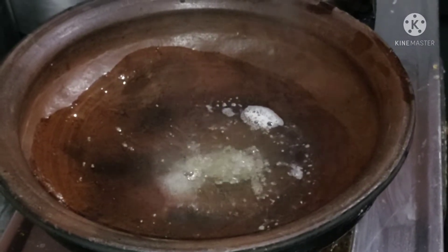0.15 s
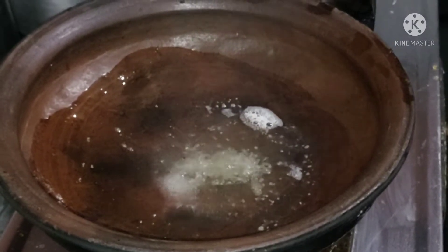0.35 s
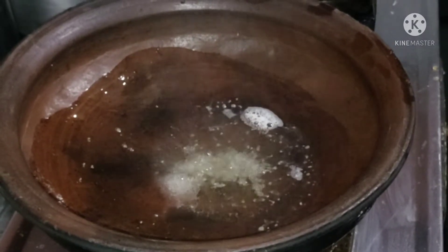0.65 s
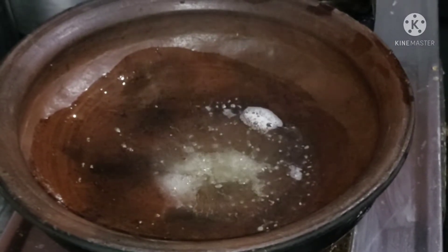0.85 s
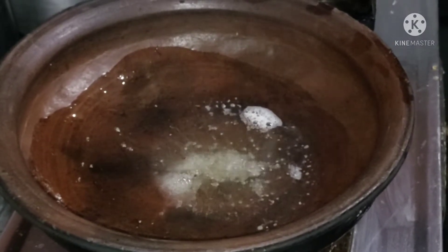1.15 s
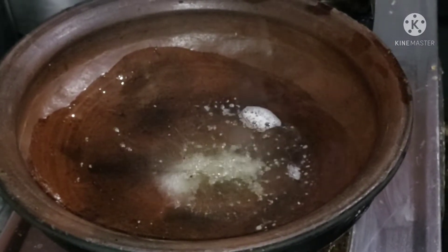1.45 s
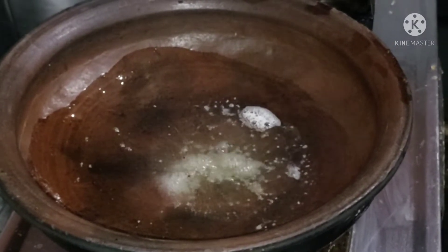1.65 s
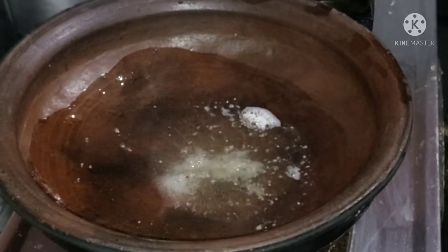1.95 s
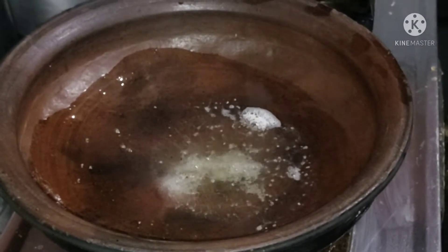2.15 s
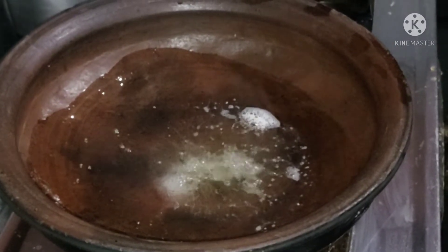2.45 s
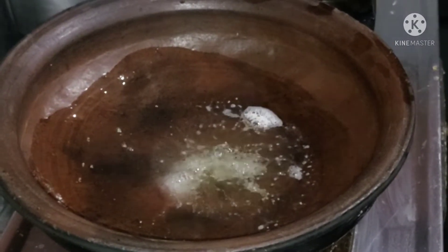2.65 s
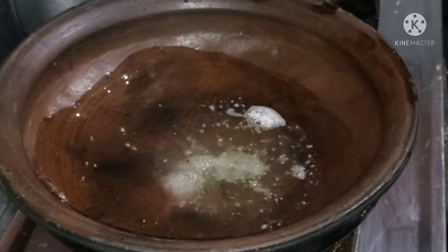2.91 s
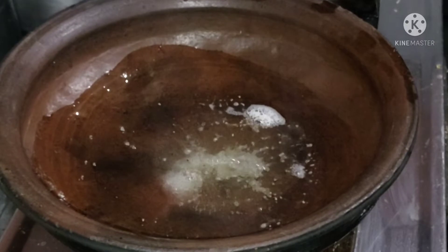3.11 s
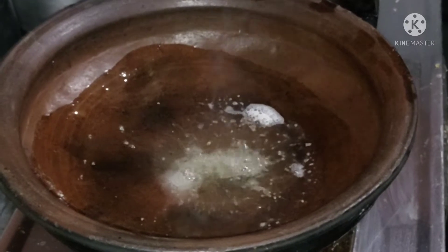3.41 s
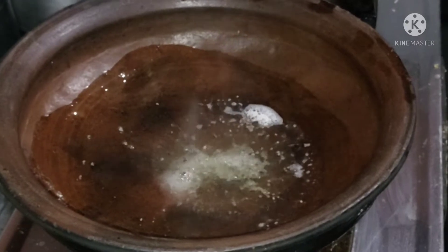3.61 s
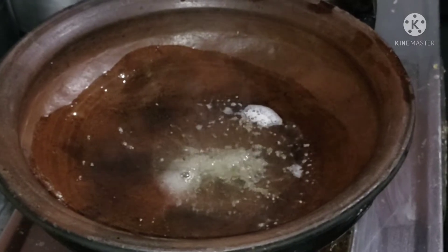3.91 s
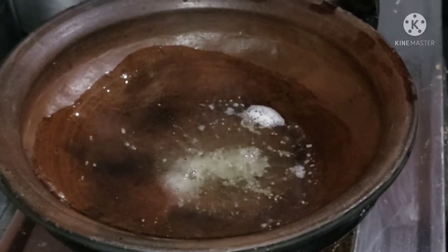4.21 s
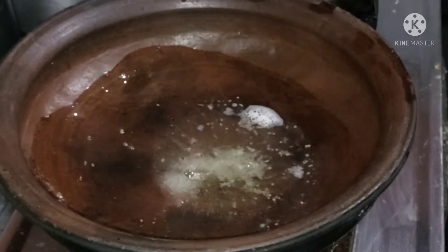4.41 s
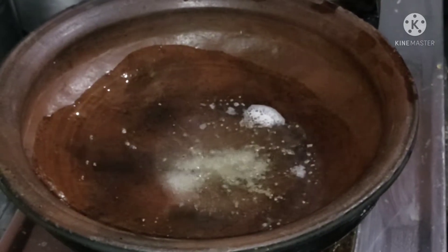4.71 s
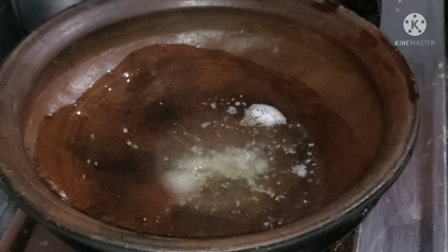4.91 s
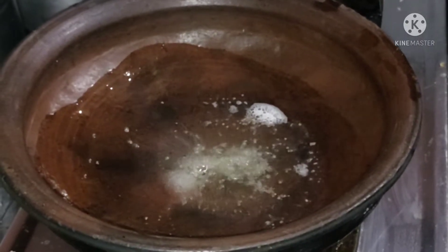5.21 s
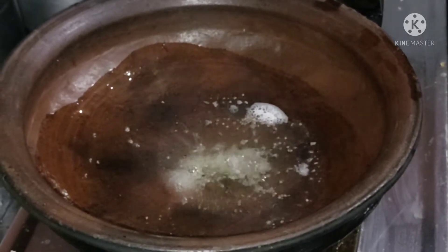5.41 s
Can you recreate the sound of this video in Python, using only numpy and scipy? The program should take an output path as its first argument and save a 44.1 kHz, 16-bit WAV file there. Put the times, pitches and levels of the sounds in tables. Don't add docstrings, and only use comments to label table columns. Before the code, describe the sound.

Irregular loud pops and small crackles of seeds bursting in oil, with hollow pot ring, tiny steam spits and short room echo.

```python
import sys
import numpy as np
from scipy import signal
from scipy.fft import rfft, irfft, next_fast_len
from scipy.io import wavfile
from scipy.ndimage import map_coordinates

SR = 44100
rng = np.random.default_rng(int(sys.argv[2]) if len(sys.argv) > 2 else 0)


def invert_db(x):
    u = np.asarray(x, float) / 20
    return 10 ** u


def wav_out(sig):
    wavfile.write(sys.argv[1], SR, np.round(np.clip(np.atleast_2d(sig).T, -1, 1) * 32767).astype(np.int16))


N = 245195
TAIL = 24576

# (frequency [Hz], width [Hz], level [dB])
POT_AIR = [(1012, 112, -8.5), (1276, 143, -3), (1591, 116.5, 4), (1900, 940, -16.5)]
# (frequency [Hz], width [Hz], level [dB])
SECOND_RING = [(2168, 213, 0)]
THIRD_RING = [(2638, 260, 0)]
# (frequency [Hz], width [Hz], level [dB])
CLAY_WALL = [(315, 310, -5.5), (481, 91, 0), (700, 120, 0.5)]
# (frequency [Hz], width [Hz], level [dB])
HUSK_CRACK = [(2970, 700, 3.5), (4300, 2060, 4.5)]
# (frequency [Hz], width [Hz], level [dB])
JET_BODY = [(5900, 3000, 0)]
JET_TOP = [(9100, 3100, -2), (15000, 9000, -6)]
# (frequency [Hz], width [Hz], level [dB])
RING_ABOVE_POT = (1595, 110, 8)

# (time [s], peak [dB], second ring re peak [dB], crack re peak [dB])
WALL_SEEDS = [(0.166, -16, -23.5, -63), (0.2, -26.5, -20, -48), (0.56, -26.5, -19, -31.5),
              (1.158, -23.5, -15, -52), (1.4206, -23.5, -12.5, -16), (1.6414, -32, -42, -49),
              (1.72, -26, -21.5, -48), (1.7675, -37.5, -26, -23), (2.1297, -39.5, -8.5, -37),
              (2.716, -50, 3, -25), (2.7965, -41, -17, -32), (4.2071, -29, -11.5, -16.5),
              (4.5132, -27.5, -11.5, -15), (4.8598, -26.5, -22, -24), (4.8699, -42.5, -4.5, -39),
              (4.9457, -30, -15.5, -23.5), (5.0372, -29.5, -11, -11), (5.0946, -25, -16.5, -15.5),
              (5.1225, -16, -17, -24.5), (5.2119, -42, -15, -34), (5.4844, -20, -13, -52),
              (5.516, -44, -6, -28)]
# (time [s], peak [dB], upper rings re peak [dB], crack re peak [dB])
BETWEEN_SEEDS = [(-0.12, -16.5, -21.5, -37), (0.041, -25.5, -21.5, -31.5), (0.435, -26, -9.5, -23),
                 (0.7773, -46, -20, -53), (1.0775, -32, -4.5, -11.5), (1.2399, -30, -14.5, -23.5),
                 (1.3007, -31, -28, -29), (1.5279, -38.5, -9.5, -7.5), (1.6297, -21.5, -19, -23.5),
                 (2.0921, -31, -11, -13.5), (2.2971, -39, -12, -9.5), (2.41, -41.5, -14.5, -20),
                 (2.5509, -15.5, -21, -23.5), (2.6106, -31.5, -19, -14), (2.7821, -35, -21, -19.5),
                 (3.029, -27.5, -24.5, -22), (3.276, -16, -22.5, -26), (3.3288, -23, -8, -12),
                 (3.3725, -20.5, -10.5, -18), (3.44, -25.5, -5, -10.5), (3.8128, -18, -16.5, -26.5),
                 (3.8993, -26.5, -40, -47), (4.6209, -24.5, -14, -11.5), (4.7566, -37.5, -15.5, -11.5),
                 (5.239, -38, -22, -20), (5.388, -48.5, 0, -26), (5.4246, -17, -16.5, -25.5),
                 (5.475, -24, -13, -14)]
# (time [s], peak [dB], third ring re peak [dB], crack re peak [dB])
MIDDLE_SEEDS = [(0.2438, -26.5, -6, -11), (0.842, -30.5, -20.5, -25.5), (1.1898, -56, -2, -36),
                (1.3721, -35.5, -4, -13.5), (1.4605, -21.5, -18.5, -30), (1.8274, -40, 7, -5),
                (1.9803, -75, -4, -29), (2.4664, -30, -14, -8.5), (2.5214, -33.5, 1.5, -19),
                (2.6722, -22, -9, -18.5), (3.348, -23.5, -14, -37), (3.456, -32, -4, 3.5),
                (3.7849, -44.5, -7, -3), (3.9378, -34.5, -14.5, -64), (5.1612, -20, -21.5, -61),
                (5.3204, -35, 3.5, -5)]
# (time [s], jet level [dB], its top re jet [dB])
STEAM_JETS = [(0.166, -47, -18), (0.2444, -46.5, -39), (0.435, -48, -14), (0.842, -53, -33),
              (1.0783, -49, -26), (1.1582, -52, -7), (1.1904, -53, -1), (1.3723, -55, -23),
              (1.4207, -61, -11), (1.4606, -51, -18), (1.5273, -33, 6), (1.6303, -44.5, -24),
              (2.0926, -53.5, -24), (2.2974, -67, -22), (2.4667, -41.5, -35), (2.6103, -75, -22),
              (2.6731, -51, -17), (2.7824, -58, -14), (2.7973, -53, -13), (3.029, -64, -16),
              (3.2767, -41.5, -10), (3.3284, -36.5, -15), (3.3488, -39.5, -20), (3.456, -48, -8),
              (3.8135, -43, -27), (4.6215, -53, -4), (4.7559, -48, -14), (5.0944, -36.5, -63),
              (5.3209, -68, -24), (5.475, -65, -34)]
# (time [s], peak [dB])
CLAY_THUDS = [(0.2, -57), (1.158, -50.5), (1.522, -50), (2.553, -59), (2.716, -57), (2.794, -76),
              (3.327, -49), (3.813, -51), (3.901, -67), (4.621, -70), (5.09, -56.5), (5.122, -59)]

# (frequency [Hz], level [dB])
STANDING_WAVES = [(715, -4), (892, -4), (983, -2), (1075, 0), (1175, -2), (1255, -4), (1324, 1), (1422, -5),
                  (1550, -2), (1628, 1), (1695, -4), (1744, -5), (1784, -4), (1842, -6), (1898, -3),
                  (1962, -5), (2077, -2), (2120, 0), (2245, -4), (2434, -5), (2686, 0), (2955, -4),
                  (3187, -1), (3436, -4)]
# (frequency [Hz], decay by 60 dB [s])
KITCHEN_DECAY = [(300, 0.81), (800, 0.45), (2100, 0.4), (5500, 0.23), (14000, 0.35)]
# (frequency [Hz], correlation [-1..1])
PORT_LIKENESS = [(30, 0.5), (100, 0.14), (300, 0.6), (700, 0.38), (1500, 0.011), (15000, 0.014)]
# (frequency [Hz], left minus right [dB])
PORT_DIFFERENCE = [(60, 1), (95, 1), (150, 0), (240, 0), (380, 0), (600, 2), (950, 0), (1500, 0.5),
                   (2380, -2.5), (3770, -7), (5980, -5), (9470, 4.5), (15000, 12)]

# (start [s], end [s], frequency [Hz], level [dB])
FAR_HORNS = [(-.1, .17, 768, -62), (-.1, .2, 965, -65), (-.1, .2, 860, -70), (.14, .28, 760, -64),
             (.16, .36, 690, -70), (.71, .93, 357, -74), (2.62, 2.79, 387, -60), (2.76, 2.89, 389, -70),
             (2.77, 2.89, 516, -70), (2.77, 2.89, 356, -71), (2.92, 3.06, 391, -77)]
# (frequency [Hz], density [dB per Hz])
AIR_COLOUR = [(12, -11), (20, -6.5), (98, -3), (168, -7), (293, -12), (446, -13), (527, -14.5),
              (698, -20.5), (1570, -17), (2460, -17), (10500, -22.5), (16000, -31.5)]
# (time [s], peak [dB], half width [s])
MOTOR_SWELLS = [(.32, -66, .07), (.8, -82, 0.49), (1.22, -71, 0.13), (2.12, -70.5, 0.091),
                (2.72, -79, 0.067), (3.38, -90, 0.24), (3.75, -90, 0.039), (3.95, -70, 0.032),
                (4.27, -72, .06), (4.68, -72.5, 0.23), (5.56, -83, 0.061)]


def unit(x):
    return x / np.sqrt(np.mean(x ** 2) + 1e-20)


def along(points, hz):
    f, v = np.transpose(points)
    return np.interp(np.log(hz + 1), np.log(f + 1), v)


def wobble(rate):
    knots = rng.standard_normal(int(N * rate / SR) + 4)
    return map_coordinates(knots, [np.arange(N) * rate / SR])


def filtered(x, response):
    m = next_fast_len(N + SR // 2)
    return irfft(rfft(x, m) * response(np.fft.rfftfreq(m, 1 / SR)), m)[..., :N]


def spread(f):
    return np.arccos(np.clip(along(PORT_LIKENESS, f), -1, 1)) / 2


def paired(shared, opposite, turn):
    mid, side = np.cos(turn) * shared, np.sin(turn) * opposite
    return np.array([mid + side, mid - side])


def resonance(f, hz, width):
    return 1j * f * width / (hz * hz - f * f + 1j * f * width)


def ring(modes, f):
    tone = 0
    for k, (hz, width, db) in enumerate(modes):
        tone = tone + (-1) ** k * invert_db(db) * resonance(f, hz, width)
    low, high = modes[0][0], modes[-1][0]
    tone = tone * (1j * f / low / (1 + 1j * f / low)) ** 2 / (1 + 1j * f / high) ** 2
    return tone / np.abs(irfft(tone)).max()


def pot_rings(f):
    sources = (POT_AIR, SECOND_RING, THIRD_RING, CLAY_WALL, HUSK_CRACK, JET_BODY, JET_TOP)
    rings = np.array([ring(modes, f) for modes in sources])
    rings[4] /= 1 - 0.15 * np.exp(-2j * np.pi * f / 535)
    skirt_hz = 6500
    rings[:5] /= 1 - (f / skirt_hz) ** 2 + 1.4j * f / skirt_hz
    rings[[2, 5]] *= -1
    late = np.array([.0014, .0012, .001, .0014, .0008, .0004, .0004])
    rings *= np.exp(-2j * np.pi * f * late[:, None])
    rings[5:] = np.abs(rings[5:]) * np.exp(1j * np.angle(rings[4]))
    return rings


def tear(ms, share):
    t = np.arange(600) / SR
    puff = rng.standard_normal(len(t)) * np.exp(-t / (ms / 1000))
    return 1 - share + share * rfft(puff / np.linalg.norm(puff), TAIL)


def steam_jet(time, peak_db):
    jets = [(peak_db - 40, -18)]
    for at, level, top in STEAM_JETS:
        if abs(at - time) < .0045:
            jets.append((level, top))
    return max(jets)


def placed_seeds():
    wall_loss_db, between_loss_db, middle_loss_db = -8.5, 0, -16.5
    seeds = [(s, db, up, up + wall_loss_db, crack) for s, db, up, crack in WALL_SEEDS]
    seeds += [(s, db, up, up + between_loss_db, crack) for s, db, up, crack in BETWEEN_SEEDS]
    seeds += [(s, db, up + middle_loss_db, up, crack) for s, db, up, crack in MIDDLE_SEEDS]
    return sorted(seeds)


def seed_burst(rings, time, db, second, third, crack):
    trim_db = np.array([-7.0, 7.5, 6.5, -37, 10.5, 5, 5.5])
    jet, top = steam_jet(time, db)
    gains = invert_db(trim_db + [db, db + second, db + third, db, db + crack, jet, jet + top])
    pot = tear(1.5, .25) * (gains[:4] @ rings[:4])
    snap = gains[4] * rings[4] * tear(.5, .3)
    steam = tear(1.6, .38) * (gains[5:] @ rings[5:])
    return pot + snap + steam


def near_sound(f):
    hz, width, db = RING_ABOVE_POT
    above = 1 + invert_db(db) * resonance(f, hz, width)
    round_trip = np.array([[.0114], [.0112]])
    wall_dull_hz = 5000
    bounce = np.exp(-2j * np.pi * f * round_trip) / np.sqrt(1 + (f / wall_dull_hz) ** 2)
    beam = 1 + 1.4 * np.exp(-(np.log((f + 1) / 5300) / .45) ** 2)
    return invert_db(-1.5) * beam * (above + 0.75 * bounce / (1 - 0.1 * bounce))


def diffuse(f, count):
    hz, t = np.fft.rfftfreq(256, 1 / SR), np.arange(180) * 128 / SR
    fall_db = -60 * t / along(KITCHEN_DECAY, hz)[:, None]
    decay = invert_db(fall_db) + invert_db(-14.5 + 0.78 * fall_db)
    grains = rng.standard_normal((2, count, 2, *fall_db.shape), dtype=np.float32)
    tails = signal.istft((grains[0] + 1j * grains[1]) * decay, nperseg=256)[1]
    t = np.arange(tails.shape[2]) / SR
    walls = 0.7 + 0.3 * np.clip((t - .006) / 0.005, 0, 1)
    tails = tails * walls * np.clip(t / 0.0015, 0, 1)
    shared, opposite = np.moveaxis(rfft(tails / np.linalg.norm(tails[0, 0]), TAIL), 1, 0)
    return np.moveaxis(paired(shared, opposite, spread(f)), 0, 1)


def standing(f, count):
    hz, db = np.transpose(STANDING_WAVES)
    width = 2.42 / along(KITCHEN_DECAY, hz)[:, None]
    turn = 2 * np.pi * rng.random((count, 1, len(hz))) + rng.normal(0, 0.7, (count, 2, len(hz)))
    level = invert_db(db + rng.normal(0, 3.5, (count, 1, len(hz))))
    return (level * np.exp(1j * turn)) @ (width / (width + 2j * (f - hz[:, None])))


def in_kitchen(bursts, f):
    near = near_sound(f)
    tails = invert_db(6.5) * diffuse(f, count=26)
    modes = invert_db(14) * standing(f, count=len(bursts))
    delay = .002 + 5e-5 * np.array([[-1], [1]])
    lag = np.exp(-2j * np.pi * f * delay)
    out = np.zeros((2, N + SR + TAIL))
    for k, (time, burst) in enumerate(bursts):
        start = round((time - .0036 + 1) * SR)
        room = near + modes[k] + tails[k % len(tails)]
        out[:, start:start + TAIL] += irfft(burst * lag * room, TAIL)
    return out[:, SR:SR + N]


def pops():
    f = np.fft.rfftfreq(TAIL, 1 / SR)
    rings = pot_rings(f)
    bursts = [(time, invert_db(db - 3.5) * rings[3]) for time, db in CLAY_THUDS]
    bursts += [(seed[0], seed_burst(rings, *seed)) for seed in placed_seeds()]
    return in_kitchen(bursts, f)


def horns():
    t = np.arange(N) / SR
    out = np.zeros((2, N))
    for start, end, hz, db in FAR_HORNS:
        swell = np.clip(np.minimum(t - start, end - t) / .04, 0, 1) ** 2
        waver = invert_db(db + 2.5 * np.array([wobble(25), wobble(25)]))
        out += swell * waver * np.sin(2 * np.pi * hz * t + .95 * wobble(28))
    return out


def air():
    shared, opposite = rng.standard_normal((2, N))
    mid = filtered(shared, lambda hz: invert_db(along(AIR_COLOUR, hz)) * np.cos(spread(hz)))
    side = filtered(opposite, lambda hz: invert_db(along(AIR_COLOUR, hz)) * np.sin(spread(hz)))
    noise = mid + side * np.array([[1], [-1]])
    low = filtered(noise, lambda hz: 1 / (1 + (hz / 500) ** 4))
    traffic = invert_db(1.2 * wobble(4) + 1.5 * wobble(9))
    return invert_db(-69.5) * unit(noise + low * (traffic - 1))


def motor():
    t = np.arange(N) / SR
    load = invert_db(-81)
    for time, db, half in MOTOR_SWELLS:
        load = load + invert_db(db) * np.exp(-((t - time) / half) ** 2)
    hum = load * invert_db(2.5 * wobble(15)) * np.sin(2 * np.pi * 93 * t + 1.4 * wobble(18))
    return hum * invert_db(0) * np.array([[invert_db(.7)], [invert_db(-.7)]])


def scene():
    return pops() + horns() + air() + motor()


def roll_off(x):
    return signal.sosfilt(signal.butter(12, 16490, fs=SR, output="sos"), x)


def record(dry):
    top_hz = 15700
    sides = np.array([[.5], [-.5]])
    ports = filtered(dry, lambda hz: invert_db(along(PORT_DIFFERENCE, hz) * sides) * (hz < top_hz))
    return roll_off(ports)


dry = scene()
out = record(dry)
wav_out(out)
```